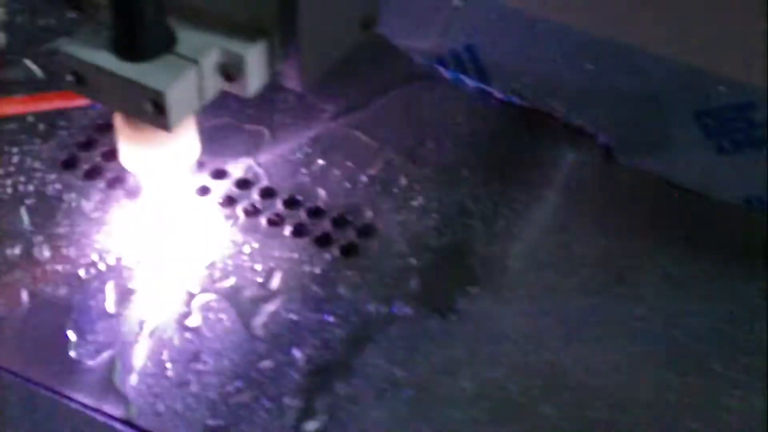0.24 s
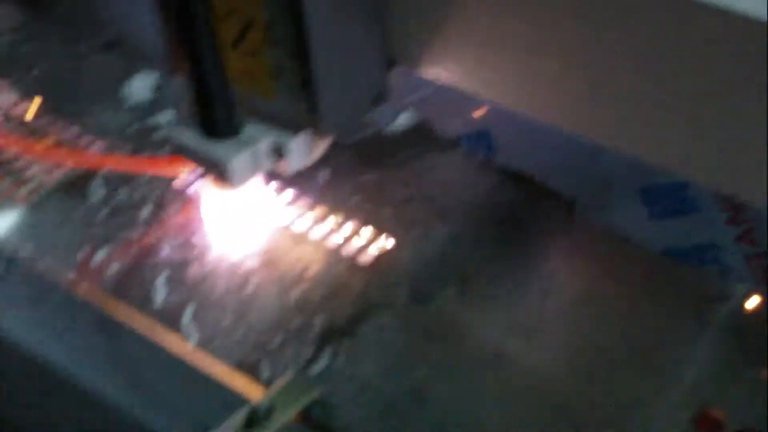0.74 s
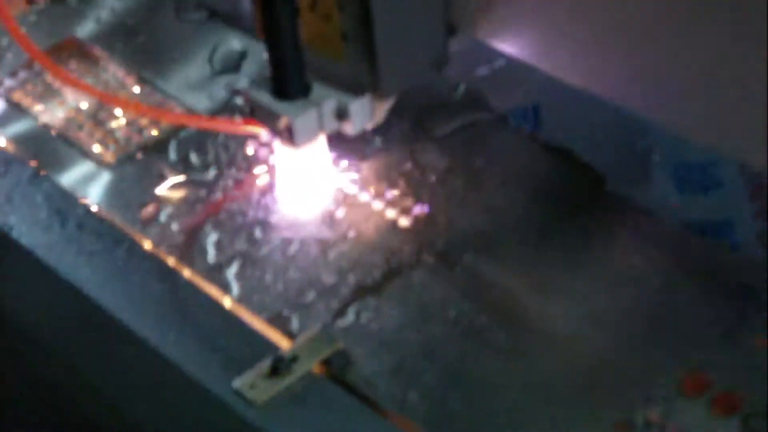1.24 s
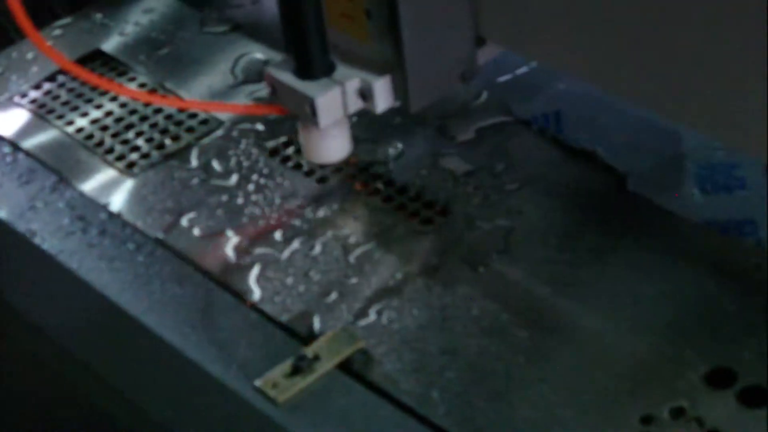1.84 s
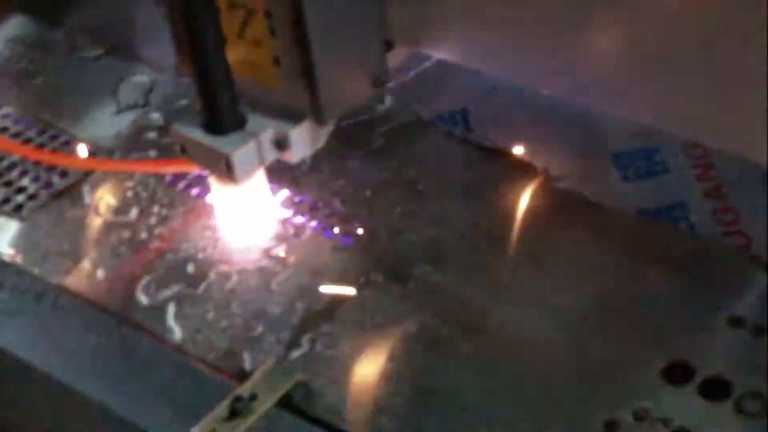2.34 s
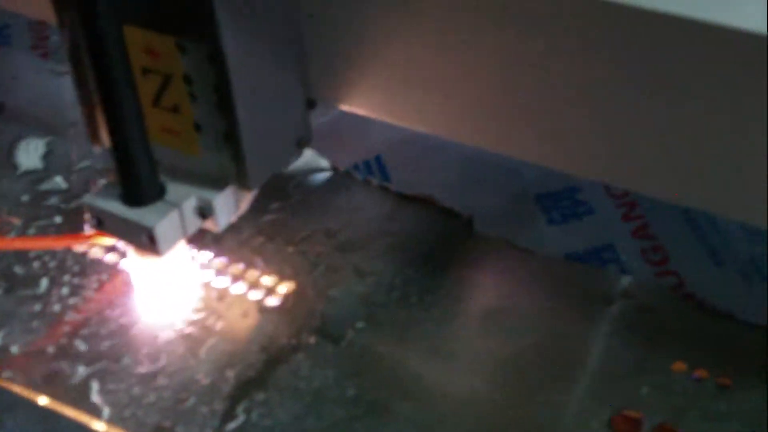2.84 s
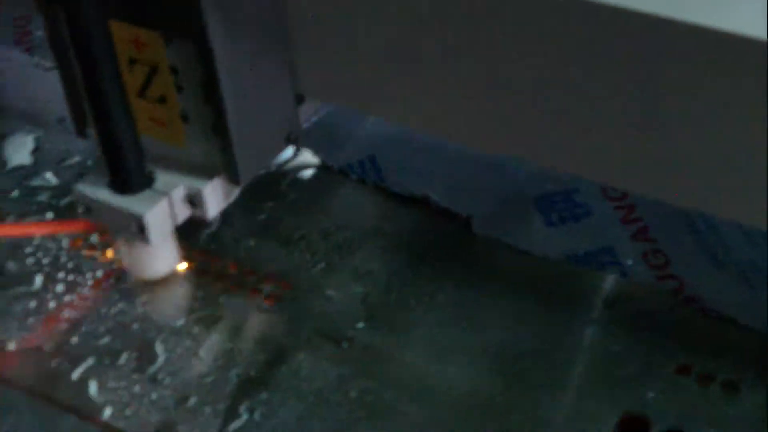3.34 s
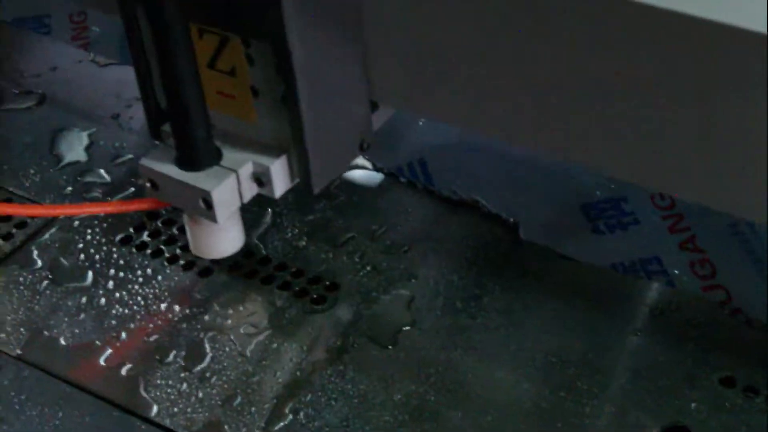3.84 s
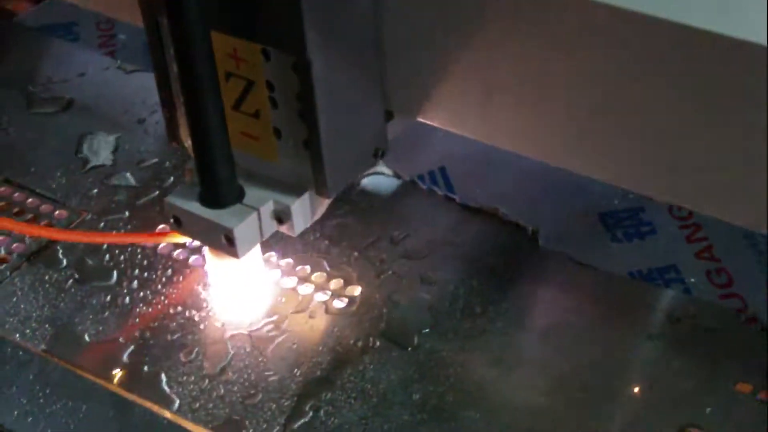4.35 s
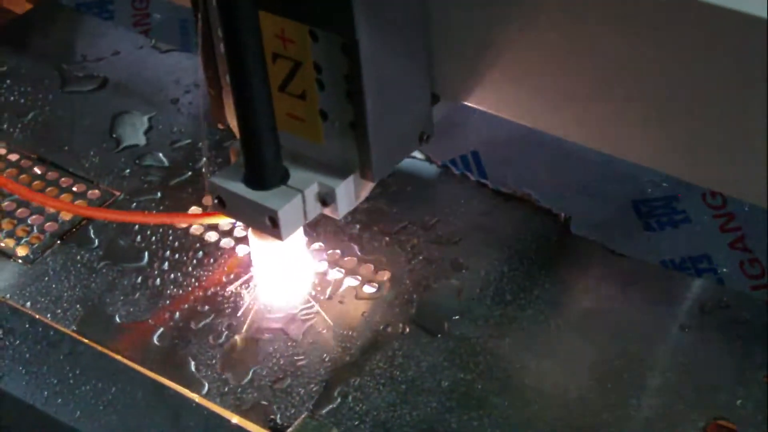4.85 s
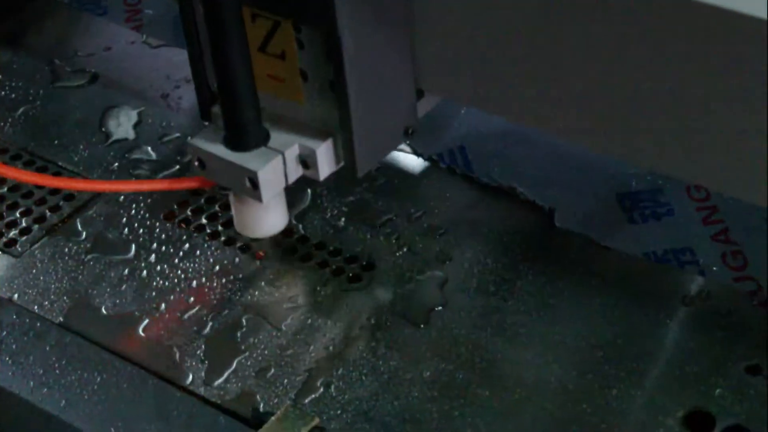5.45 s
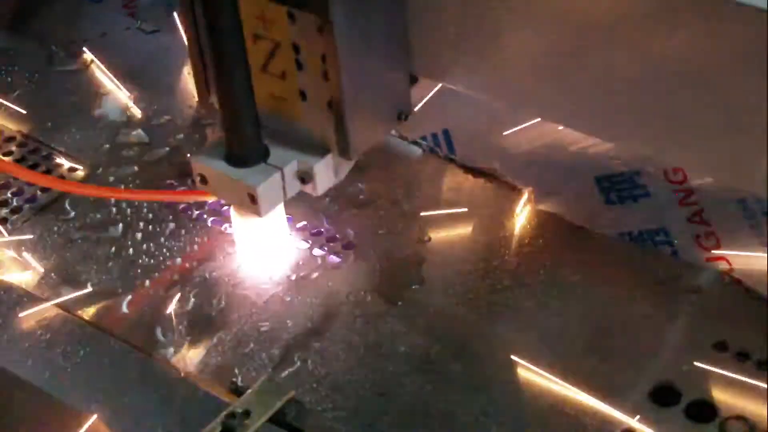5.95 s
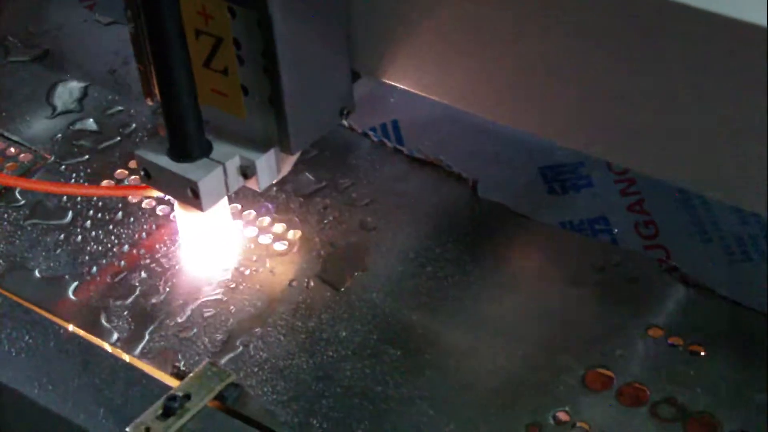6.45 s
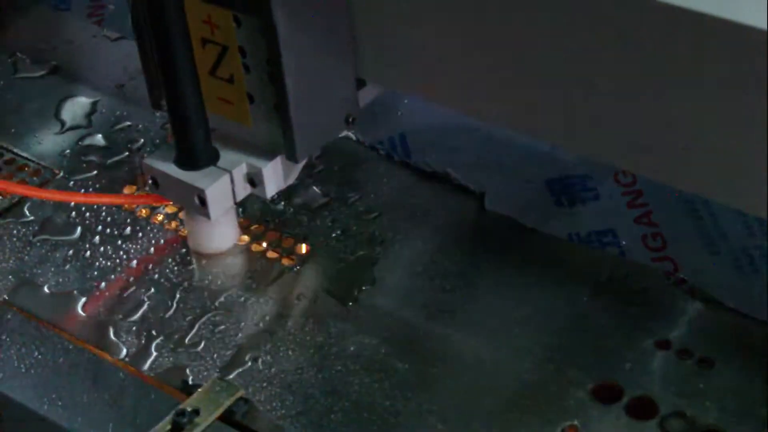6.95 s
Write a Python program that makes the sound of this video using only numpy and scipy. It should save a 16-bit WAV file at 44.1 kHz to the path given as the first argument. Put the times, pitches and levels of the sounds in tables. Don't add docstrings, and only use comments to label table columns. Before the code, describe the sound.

Close to a plasma torch, gas hisses over a wet steel sheet, arcs strike with sharp cracks, cut in one-second bursts, spit and die.

```python
import sys
import numpy as np
from scipy import signal
from scipy.fft import rfft, irfft, next_fast_len
from scipy.io import wavfile
from scipy.ndimage import uniform_filter1d

SR = 44100
rng = np.random.default_rng(int(sys.argv[2]) if len(sys.argv) > 2 else 0)


def gain_from_db(level_db):
    decades = np.asarray(level_db, float) / 20
    return 10 ** decades


def wrap_up_sound(samples):
    columns = np.atleast_2d(samples).T
    tamed = np.clip(columns, -1, 1)
    steps = np.round(tamed * 32767).astype(np.int16)
    wavfile.write(sys.argv[1], SR, steps)


N = 317079
HOP, SIZE = 128, 512
STEP = 32

# arc strikes, sheet pierced, arc off, gas back, torch lowered, all in seconds.
HOLES = [(-1.55, -1.35, -0.35, -0.23, -0.01), (0.297, 0.482, 1.49, 1.6, 1.835),
         (2.123, 2.326, 3.33, 3.438, 3.7), (3.963, 4.161, 5.166, 5.288, 5.52),
         (5.802, 5.994, 7.0, 7.12, 7.37), (7.64, 7.84, 8.84, 8.96, 9.2)]
MOMENTS = ["strike", "through", "off", "gas", "down"]

# moment, seconds after it, hiss in dB, body in dB over hiss, sizzle in dB over hiss.
JET_CYCLE = [("strike", -.008, -21, -9, -11), ("strike", .012, -19, -5.5, -7.5),
             ("strike", .08, -18.6, -8.5, -10), ("through", -.065, -21, -3.5, -6.5),
             ("through", -.007, -18, -5.3, -12.5), ("through", .007, -23.5, -7, -8),
             ("through", .075, -25.6, -5.3, -5), ("through", .17, -21.6, -6.2, -7),
             ("through", .33, -20.1, -5.2, -7.2), ("off", -.2, -20.1, -6, -7.5),
             ("off", -.05, -19.4, -4.2, -8), ("off", -.007, -21.5, -2.5, -8), ("off", .012, -30, -2.3, -10),
             ("gas", -.01, -28.8, -5, -9.4), ("gas", .015, -22, -6, -13), ("gas", .12, -23.8, 0.2, -8),
             ("down", -.03, -22.5, -3, -10.3), ("down", .09, -21.8, -9, -11)]
# moment, seconds after it, ring in dB.
GAP_CYCLE = [("strike", -.008, -22.3), ("strike", .02, -25), ("through", -.09, -25.6),
             ("through", -.008, -30.5), ("through", .008, -34.5), ("through", .27, -28.4),
             ("off", -.2, -29.2), ("off", -.07, -28.5), ("off", -.02, -25.6), ("off", .04, -36.4),
             ("gas", 0, -33), ("gas", .1, -22), ("down", .1, -21.2)]
# moment, seconds after it, level in dB.
WHISTLE_CYCLE = [("strike", -.01, -30), ("strike", .05, -42), ("through", -.02, -33), ("through", .04, -38),
                 ("through", .25, -34.4), ("off", -.02, -33.6), ("off", .05, -36), ("gas", .08, -31),
                 ("down", .06, -33)]
# moment, seconds after it, drone in dB, clatter in dB over drone.
SHOP_CYCLE = [("strike", -.008, -34, 0.6), ("strike", .02, -44.5, 12), ("strike", .08, -44.8, 8),
              ("through", -.008, -45.5, 8), ("through", .02, -40, 1.5), ("through", .15, -39.6, 5),
              ("off", -.2, -38.6, 4.6), ("off", -.02, -41, 9), ("off", .03, -38.4, 1.3),
              ("gas", 0, -40.6, 5.5), ("down", -.1, -37, 5.5), ("down", -.03, -33.4, 4),
              ("down", .1, -35.4, 2.6)]

# jet while piercing, jet just after breaking through, jet while waiting,
# whistle while cutting, whistle while waiting, all in dB.
VIGOUR = [(0, 0, 0.9, 0, -7.5), (0.3, -0.3, -0.4, 0.8, -1.2), (0.3, 1.2, -0.2, 3.6, 0.3),
          (-0.4, -1.6, 0.3, -2.6, 0.6), (0.1, 1.4, 0.3, -1.2, 0.3), (0, 0, 0, 0, 0)]
# body while cutting, body while waiting, sizzle while piercing,
# sizzle while cutting, sizzle while waiting, all in dB.
TINT = [(0, -1.5, 0, 0, 0), (-0.3, -1.6, 2.2, 0.9, -1.1), (1.1, 0.8, -1.2, -0.2, 0.1),
        (0.3, -0.2, 0.1, 0.4, 0.1), (1.3, 1.2, 0.3, 0.9, -1.2), (0, 0, 0, 0, 0)]
# piercing, just after breaking through, waiting, as the gas returns, all in dB.
POCKET = [(0, 0, 0.8, 0), (1.8, -1.5, -0.6, 0.6), (-0.4, 0.8, -0.3, 3), (-1.3, -1.6, -0.2, 0.8),
          (0.1, -1.2, 2.5, 0.3), (0, 0, 0, 0)]
# drone while waiting, clatter while piercing, while cutting, while waiting,
# just after breaking through, all in dB.
BUSTLE = [(1.2, 0, 0, -5.5, 0), (0.4, -4, 1.6, -0.9, -5), (1.8, 1.3, 0.1, -0.2, 0.6),
          (0.1, 0.2, -0.6, -1.1, -0.5), (-4, 0.3, 0.9, 1.2, -0.5), (0, 0, 0, 0, 0)]
RECOVER_S, RETURN_S = .13, .1

# frequency in Hz, density in dB per Hz.
HISS_SPECTRUM = [(1940, -36), (3300, -5.5), (3970, -5.2), (4750, -3.2), (5420, -3.5), (6000, -2.8),
                 (6520, -1.8), (6950, -1.5), (7740, -5.5), (8840, -2), (11100, -3), (13700, -5.5),
                 (15100, -6)]
# frequency in Hz, width in Hz, height in dB.
SHEET_MODES = [(4420, 200, 1.5), (5440, 360, -1), (9300, 400, 1.5), (9900, 300, .5), (6950, 300, -2),
               (6500, 300, 1.5), (7380, 400, 3.5), (7800, 200, 3), (8140, 200, 4.5), (8370, 180, 5.5),
               (8960, 150, 2.5), (11800, 700, 1.3)]
# time in seconds, frequency in Hz.
ECHO_TRACK = [(0.0, 5500), (0.65, 5500), (0.8, 7200), (0.95, 7200), (1.1, 5600), (1.65, 4200), (1.95, 5600),
              (2.2, 5600), (2.9, 5900), (3.05, 7300), (3.42, 7300), (3.5, 4200), (4.75, 4400), (5.3, 4200),
              (6.12, 7200), (6.22, 4500), (6.5, 4400), (6.65, 7900)]
ECHO_WIDTH_HZ, ECHO_DB = 1100, 2.6
# time in seconds, depth in dB.
GASPS = [(3.291, 8), (5.126, 7.5), (6.964, 9.5)]
GASP_S = .012
BORE_HZ, BORE_WIDTH_HZ, BORE_DB, BORE_S = 7250, 600, 5, .07

# frequency in Hz, width in Hz, level in dB.
GAP_MODES = [(2545, 740, 1.9), (2800, 210, -10), (3150, 580, 0.3), (3790, 1000, -7), (1850, 1000, -15)]
# time in seconds, frequency in Hz.
GAP_TRACK = [(0.0, 2790), (0.3, 2930), (1.11, 3080), (1.5, 3080), (1.6, 2720), (1.7, 3000), (2.2, 3100),
             (2.32, 2750), (3.23, 2960), (3.45, 2450), (3.62, 2480), (3.83, 2700), (3.96, 2550),
             (4.9, 2920), (5.5, 2700), (5.78, 3050), (5.85, 2740), (7.19, 2860)]

WHISTLE_HZ, WHISTLE_WIDTH_HZ = 6748, 28
# time in seconds, length in seconds, rise in dB.
CATCHES = [(0.1, .15, 2), (0.27, .04, 4), (0.38, .12, -6), (0.55, .12, -5), (2.2, .1, -4), (4.1, .15, -4),
           (4.35, .1, -3), (1.05, .1, 2.2), (1.78, .14, 4), (2.02, .2, 6.5), (2.35, .17, -6), (2.55, .1, 5),
           (2.75, .15, 3), (2.93, .06, 3), (3.1, .05, 3), (3.42, .06, 4), (3.57, .05, 3), (3.8, .06, 7),
           (3.94, .04, 3), (4.47, .06, 4), (4.7, .05, 4), (4.98, .08, 3), (5.21, .04, 6), (5.37, .06, 6),
           (5.49, .06, 5), (5.62, .05, 3), (5.98, .04, 4), (6.39, .05, 9), (6.75, .06, 5), (7.15, .05, 6)]

# frequency in Hz, density in dB per Hz.
DRONE_SPECTRUM = [(15, -70), (25, -34), (76, -27.5), (151, -13), (189, -11), (244, -3), (374, -5.5),
                  (459, -6), (553, -6), (678, -3), (816, -5), (1300, -3), (2100, -2.5), (2730, -23),
                  (4620, -120)]
# frequency in Hz, width in Hz, height in dB.
HUM_MODES = [(117.5, 8.7, 7), (150.5, 4.4, 8), (253.7, 3.2, 4), (463, 52, 5.5), (683, 2.2, 8), (55, 8, 3),
             (875, 14, 5), (1245, 64, 1.5)]
# frequency in Hz, level in dB relative to the drone.
MOTOR_TONES = [(251, -14), (683, -9)]
# time in seconds, frequency in Hz.
DRIVE_TRACK = [(0.0, 1260), (0.2, 1410), (0.38, 1240), (0.58, 1380), (2.12, 1250), (2.18, 1120),
               (2.28, 1320), (3.6, 1400), (3.8, 1160), (4.06, 1360), (6.39, 1390), (6.47, 1260),
               (6.97, 1440), (7.19, 1270)]
# time in seconds, length in seconds, change in dB.
LULLS = [
    (0.255, .06, -5),
    (3.42, .16, 2.6),
    (1.64, .05, -2.5),
]

# start in seconds, length in seconds, first Hz, last Hz, level in dB.
WHINES = [(.17, .07, 1570, 1570, -33), (.32, .08, 790, 780, -40), (1.42, .08, 2060, 2040, -33),
          (1.665, .07, 695, 685, -32), (1.77, .1, 700, 665, -32), (2.01, .06, 1240, 1240, -32),
          (2.13, .09, 1230, 1080, -32), (2.32, .06, 680, 680, -40), (3.28, .12, 765, 760, -36),
          (3.9, .1, 695, 700, -32), (5.51, .1, 455, 450, -35), (6.46, .14, 1070, 1050, -36),
          (6.82, .06, 850, 845, -36), (6.87, .13, 1600, 1570, -33), (6.85, .1, 1290, 1270, -34)]
# time in seconds, peak in dB, ring in Hz, 60 dB decay in seconds.
STRIKES = [
    (0.2932, -8.5, 2220, 0.038),
    (2.1239, -0.5, 2740, 0.017),
    (3.9622, 0.9, 2580, 0.028),
    (5.8005, 2.5, 2720, 0.03),
]
# time in seconds, peak in dB, ring in Hz, 60 dB decay in seconds.
KNOCKS = [(1.325, -20, 1040, 0.15), (1.455, -17, 1060, 0.087), (1.826, -8.5, 1190, 0.028),
          (3.278, -16, 1543, 0.063), (3.679, -16, 640, 0.08), (3.987, -24, 1110, 0.11),
          (5.113, -15, 1335, 0.04), (5.359, -20, 555, 0.062), (5.499, -14, 690, 0.065),
          (5.819, -20, 1163, 0.094), (6.489, -17, 1140, 0.08), (6.943, -14, 1330, 0.022)]
# time in seconds, peak in dB, ring in Hz, 60 dB decay in seconds.
SPITS = [(2.1312, -14, 2830, 0.044), (2.1315, -12, 8200, 0.015), (3.3106, -13, 1540, 0.056),
         (5.1125, -9, 2940, 0.02), (5.127, -13, 2800, 0.025), (5.14, -15, 3400, 0.02),
         (5.153, -16, 1650, 0.015), (1.38, -15, 1520, 0.03), (1.4535, -11, 3200, 0.025),
         (6.977, -15, 2400, 0.012), (6.8277, -14, 3190, 0.043), (6.9092, -20, 1630, 0.05)]

# middle in seconds, length in seconds,
# frequency in Hz, width in Hz, gain in dB.
REFLECTIONS = [(.24, .5, 4050, 400, -8), (1.72, .2, 3700, 900, 2), (4.15, .4, 6400, 400, 4),
               (4.05, .2, 7400, 700, 2), (4.1, .3, 9000, 700, -3), (3.57, .24, 7400, 700, 4),
               (.14, .32, 2400, 200, 2), (.14, .32, 8400, 700, 2), (.14, .32, 9300, 250, 2),
               (.4, .18, 200, 250, -7), (.4, .18, 750, 400, 5), (1.88, .46, 3420, 250, 3),
               (1.88, .46, 3740, 150, -3), (1.76, .2, 3950, 200, 4), (1.8, .3, 4300, 150, 4),
               (1.88, .46, 5650, 150, 3), (1.88, .46, 2800, 200, -2), (1.98, .28, 8300, 1200, 2.5),
               (3.72, .46, 2480, 250, 2), (3.72, .46, 3530, 150, -4), (3.72, .46, 3740, 200, 5),
               (3.6, .2, 4000, 200, 3), (3.8, .3, 4600, 250, -4), (3.72, .46, 5250, 300, 2),
               (3.78, .2, 2650, 300, -3), (1.72, .2, 1050, 400, 3), (5.56, .46, 2180, 150, -4),
               (5.56, .46, 2380, 200, 3), (5.56, .46, 2800, 150, -2), (5.56, .46, 3230, 200, 2),
               (5.56, .46, 4400, 300, 2), (5.56, .46, 7350, 300, 3), (5.56, .46, 9500, 600, 3),
               (1.05, .85, 2580, 150, 2), (1.05, .85, 2850, 200, -3), (1.05, .85, 2050, 400, 2),
                       (1.05, .85, 5600, 400, 4.5), (1.05, .85, 4200, 300, 2), (2.9, .85, 2580, 150, 3),
                       (2.8, .6, 2850, 200, -3), (3.2, .25, 3200, 800, 2), (1.3, .35, 3100, 800, 2),
                       (4.55, .35, 1500, 700, 1.5), (2.9, .85, 3450, 200, 2), (2.9, .85, 5400, 250, 3),
                       (2.9, .85, 7200, 350, 2), (2.9, .85, 9500, 200, -2), (4.72, .8, 2580, 150, 2),
                       (4.72, .8, 2900, 300, -3), (4.72, .8, 1330, 200, -2), (4.72, .8, 4140, 120, 4),
                       (4.72, .8, 5300, 200, 2), (4.72, .8, 6450, 200, 4), (4.72, .8, 6900, 150, -3),
                       (4.72, .8, 9050, 200, 2), (4.63, .3, 12000, 3000, 2), (6.55, .8, 2580, 150, 2),
                       (6.55, .8, 2850, 200, -2), (6.55, .8, 3150, 250, 2), (6.45, .6, 4600, 200, 5),
                       (6.55, .8, 5100, 200, 2), (6.55, .8, 9800, 200, 4), (6.8, .4, 8100, 700, -4),
                       (6.8, .4, 2400, 300, -3), (6.8, .4, 4850, 250, -4), (2.25, .3, 7600, 400, 3),
                       (2.5, .5, 8000, 350, -3), (2.65, .5, 9000, 600, 3), (3.1, .4, 8800, 400, -3),
                       (2.8, .9, 6000, 300, -3), (1.3, .4, 5200, 300, -4), (5.9, .2, 5600, 500, 3),
                       (5.65, .5, 1600, 400, 3), (5.9, .2, 4500, 600, 3)]

NOTCH_HZ, NOTCH_WIDTH_HZ, EDGE_HZ = 7905, 110, 15300
FRAME, GRID = 1024, 274
# frame number, lowest Hz, highest Hz.
SIDE_PATCHES = [(29, 7580, 9820), (41, 10340, 14040), (46, 5170, 6370), (116, 6200, 7750),
                (116, 8960, 10500), (120, 6200, 7750), (137, 5170, 6370), (188, 4650, 5860),
                (189, 5170, 6370), (189, 12400, 14040), (192, 6890, 8440), (200, 11700, 14040),
                (262, 10340, 11900), (278, 5690, 7060), (288, 4650, 5860), (296, 12400, 14040)]


def evened(x):
    return x / np.sqrt(np.mean(x ** 2) + 1e-20)


def track(table, t):
    return np.interp(t, *np.transpose(table))


def read(points, hz):
    f, value = np.transpose(points)
    return np.interp(np.log(hz + 1), np.log(f + 1), value)


def bumps(modes, hz):
    return sum(db / (1 + (2 * (hz - f) / width) ** 2) for f, width, db in modes)


def hump(t, s, length):
    return np.exp(-((t - s) / (.6 * length)) ** 2)


def smooth(level_db):
    steps = np.arange(0, N + STEP, STEP)
    return np.interp(np.arange(N), steps, level_db(steps / SR))


def coloured(gain, ripple_db=0., turns_per_s=1.1):
    size = next_fast_len(N)
    z = rfft(rng.standard_normal((3, size)))
    comb = evened(uniform_filter1d(rng.standard_normal(z.shape), size=120))
    shaped = z * gain(np.fft.rfftfreq(size, 1 / SR)) * gain_from_db(ripple_db * comb)
    voices = irfft(shaped, size)[:, :N]
    thirds = np.arange(3)[:, None] / 3
    fades = np.cos(np.pi * (turns_per_s * np.arange(N) / SR + thirds))
    return evened((voices * fades ** 2).sum(0))


def band_rms(x, lo_hz, hi_hz):
    z, hz = rfft(x), np.fft.rfftfreq(len(x), 1 / SR)
    inside = (hz > lo_hz) & (hz < hi_hz)
    return np.sqrt(2 * np.sum(abs(z[inside]) ** 2)) / len(x)


def reshape(x, field_db):
    overlap = SIZE - HOP
    hz, t, z = signal.stft(x, SR, nperseg=SIZE, noverlap=overlap)
    return signal.istft(z * gain_from_db(field_db(hz[:, None], t)), SR, nperseg=SIZE, noverlap=overlap)[1][:N]


def patches(shape, bins, frames):
    blotches = uniform_filter1d(rng.standard_normal(shape), size=bins, axis=0)
    for _ in range(2):
        blotches = uniform_filter1d(blotches, size=frames, axis=1)
    return evened(blotches)


def cycle(rows, t):
    s = np.array([hole[MOMENTS.index(row[0])] + row[1] for hole in HOLES for row in rows])
    order = np.argsort(s)
    values = np.array([row[2:] for row in rows] * len(HOLES))[order]
    return [np.interp(t, s[order], column) for column in values.T]


def during(table, t, **columns):
    spans = dict(piercing=(0, 1), cutting=(1, 3), waiting=(3, 5))
    edges = np.append(np.ravel(HOLES), N)
    total = 0
    for k, row in enumerate(table):
        for stage, column in columns.items():
            first, last = spans[stage]
            total = total + row[column] * (t > edges[5 * k + first]) * (t < edges[5 * k + last])
    return total


def just_through(table, column, t):
    return sum(row[column] * hump(t, hole[1] + RECOVER_S, RECOVER_S) for row, hole in zip(table, HOLES))


def jet_db(t):
    own = during(VIGOUR, t, piercing=0, waiting=2) + just_through(VIGOUR, 1, t)
    return cycle(JET_CYCLE, t)[0] + own - sum(db * hump(t, s, GASP_S) for s, db in GASPS)


def jet_colour(t):
    _, body, sizzle = cycle(JET_CYCLE, t)
    body = body + during(TINT, t, cutting=0, waiting=1)
    sizzle = sizzle + during(TINT, t, piercing=2, cutting=3, waiting=4)
    bore_db = sum(BORE_DB * hump(t, hole[1] - .5 * BORE_S, BORE_S) for hole in HOLES)
    return body, sizzle, bore_db


def jet(streak_db=1.6, patch_db=0.8, flicker_db=0.6, body_db=-3.7, sizzle_db=-7.0):
    hiss = coloured(lambda hz: gain_from_db(read(HISS_SPECTRUM, hz) + bumps(SHEET_MODES, hz)) * (hz > 3300),
                    ripple_db=1.8)

    def field_db(hz, t):
        body, sizzle, bore_db = jet_colour(t)
        low = np.clip((7000 - hz) / 700, 0, 1)
        high = np.clip((hz - 11000) / 2500, 0, 1.3)
        tilt = low * (body - body_db) + high * (sizzle - sizzle_db)
        bore = (BORE_HZ, BORE_WIDTH_HZ, bore_db)
        echo = (track(ECHO_TRACK, t), ECHO_WIDTH_HZ, ECHO_DB)
        shape = (len(hz), len(t))
        drift = streak_db * patches(shape, bins=2, frames=50) + patch_db * patches(shape, bins=9, frames=40)
        flicker = flicker_db * patches((1, len(t)), bins=1, frames=6)
        return tilt + bumps([bore, echo], hz) + drift + flicker

    return gain_from_db(smooth(jet_db) - .9) * reshape(hiss / band_rms(hiss, 7300, 11540), field_db)


def gap_db(t):
    back = sum(row[3] * hump(t, hole[3], RETURN_S) for row, hole in zip(POCKET, HOLES))
    own = during(POCKET, t, piercing=0, waiting=2) + just_through(POCKET, 1, t)
    return cycle(GAP_CYCLE, t)[0] + back + own


def gap(streak_db=2.5, flutter_db=1.3, tone_db=3.5, tone_width_hz=350):
    def modes(hz):
        return np.sqrt(sum(gain_from_db(2 * db) / (1 + (2 * (hz - f) / (1.12 * width)) ** 4) ** 2
                           for f, width, db in GAP_MODES))

    def field_db(hz, t):
        shape = (len(hz), len(t))
        tone = bumps([(track(GAP_TRACK, t), tone_width_hz, tone_db)], hz)
        streaks = streak_db * patches(shape, bins=1, frames=25)
        return tone + streaks + flutter_db * patches(shape, bins=15, frames=4)

    ring = coloured(modes, ripple_db=1.2)
    return gain_from_db(smooth(gap_db) - 2.0) * reshape(ring / band_rms(ring, 2230, 3400), field_db)


def whistle_db(t):
    own = uniform_filter1d(during(VIGOUR, t, cutting=3, waiting=4), size=60)
    return cycle(WHISTLE_CYCLE, t)[0] + own + sum(db * hump(t, s, length) for s, length, db in CATCHES)


def whistle(steady=0.05):
    tone = coloured(lambda hz: 1 / (1 + (2 * (hz - WHISTLE_HZ) / WHISTLE_WIDTH_HZ) ** 2))
    strength = np.sqrt(abs(uniform_filter1d(tone ** 2, size=130)) + .02)
    return gain_from_db(smooth(whistle_db) + 3.0) * evened(tone / strength ** steady)


def shop_db(t):
    drone, clatter = cycle(SHOP_CYCLE, t)
    lulls = sum(db * hump(t, s, length) for s, length, db in LULLS)
    busy = during(BUSTLE, t, piercing=1, cutting=2, waiting=3) + just_through(BUSTLE, 4, t)
    return drone + lulls + during(BUSTLE, t, waiting=0), clatter + busy - lulls


def shop(patch_db=1.0, clatter_db=4.0, tone_db=5.5, tone_width_hz=200):
    drone = coloured(lambda hz: gain_from_db(read(DRONE_SPECTRUM, hz) + bumps(HUM_MODES, hz)) * (hz < 2200),
                     ripple_db=1.5)
    tones = sum(gain_from_db(db) * np.sin(2 * np.pi * hz * np.arange(N) / SR) for hz, db in MOTOR_TONES)

    def field_db(hz, t):
        level_db, clatter = shop_db(t)
        upper = np.clip((hz - 800) / 200, 0, 1) * (clatter - clatter_db)
        drives = bumps([(track(DRIVE_TRACK, t), tone_width_hz, tone_db)], hz)
        bass = 0.42 * np.minimum(level_db + 40, 0) * np.clip((350 - hz) / 200, 0, 1)
        return upper + drives + bass + patch_db * patches((len(hz), len(t)), bins=2, frames=20)

    level = gain_from_db(smooth(lambda t: shop_db(t)[0]) + 0.5)
    return level * reshape(drone / band_rms(drone, 180, 690) + tones, field_db)


def reflections_db(hz, t):
    return bumps([(f, width, db * np.exp(-(2 * (t - s) / length) ** 4))
                  for s, length, f, width, db in REFLECTIONS], hz)


def whines():
    out = np.zeros(N)
    for s, length, from_hz, to_hz, db in WHINES:
        u = np.arange(0, 1, 1 / (length * SR))
        phase = 2 * np.pi * np.cumsum(from_hz + (to_hz - from_hz) * u) / SR
        out[round(s * SR):][:len(u)] += gain_from_db(db + 3) * np.sin(np.pi * u) ** .6 * np.sin(phase)
    return out


def blows(rows, crack_db, spread, low_hz, size=3, puff_s=.043):
    out, t = np.zeros(N + 8000), np.arange(8000) / SR
    for s, db, hz, t60 in rows:
        ring = -np.sin(2 * np.pi * hz * t) - .4 * np.sin(2 * np.pi * hz * spread * t)
        noise = uniform_filter1d(rng.standard_normal(len(t)), size=size) * 1.33
        puff = gain_from_db(crack_db - 60 * t / puff_s) * noise
        envelope = gain_from_db(db - 60 * t / max(t60, .005)) * np.minimum(t / .0002, 1)
        out[round((s + .0004) * SR):][:len(t)] += envelope * (.75 * ring + puff)
    return signal.sosfilt(signal.butter(4, low_hz, "high", fs=SR, output="sos"), out[:N])


def scene():
    mono = reshape(jet() + gap() + shop(), reflections_db) + whistle() + whines()
    mono = mono + blows(STRIKES, crack_db=-7, spread=1.1, low_hz=1200, size=2, puff_s=.03)
    mono = mono + blows(KNOCKS, crack_db=0, spread=1.3, low_hz=347)
    mono = mono + blows(SPITS, crack_db=2.5, spread=1.6, low_hz=800)
    return np.array([mono, mono])


def side_noise(mono):
    side, n = np.zeros(N), np.arange(2 * FRAME) + (1 + FRAME) / 2
    hz = (np.arange(FRAME) + .5) * SR / (2 * FRAME)
    window = signal.windows.cosine(2 * FRAME)
    for frame, lo_hz, hi_hz in SIDE_PATCHES:
        span = slice(GRID + (frame - 1) * FRAME, GRID + (frame + 1) * FRAME)
        inside = (hz > lo_hz) & (hz < hi_hz)
        heights = rng.standard_normal(FRAME)[inside]
        band = heights @ np.cos(2 * np.pi * hz[inside, None] * n / SR)
        side[span] += gain_from_db(-4.5) * band_rms(mono[span], lo_hz, hi_hz) * evened(band) * window
    return side


def top_cut(x):
    return signal.sosfilt(signal.butter(12, 15240, fs=SR, output="sos"), x)


def record(dry):
    mono = signal.lfilter(*signal.iirnotch(NOTCH_HZ, NOTCH_HZ / NOTCH_WIDTH_HZ, SR), dry[0])
    mono = signal.sosfilt(signal.butter(2, 55, "high", fs=SR, output="sos"), mono)
    band_limit = signal.firwin(511, EDGE_HZ, window=("kaiser", 9), fs=SR)
    mono = np.clip(signal.oaconvolve(mono, band_limit, "same"), -.94, .94)
    side = side_noise(mono)
    return top_cut(np.array([mono + side, mono - side]))


dry = scene()
out = record(dry)
wrap_up_sound(out)
```